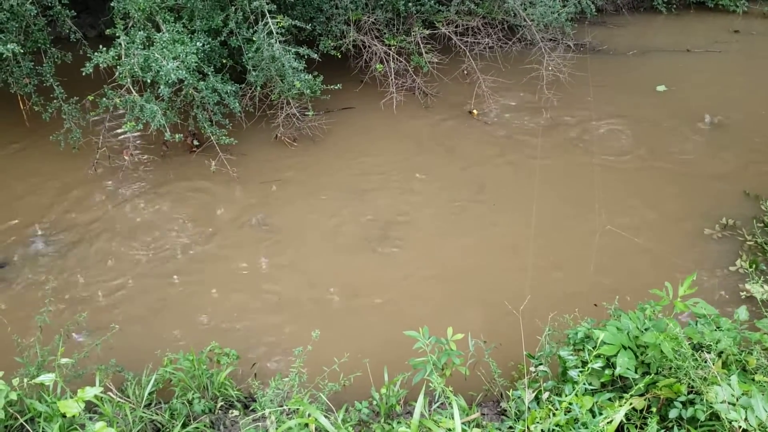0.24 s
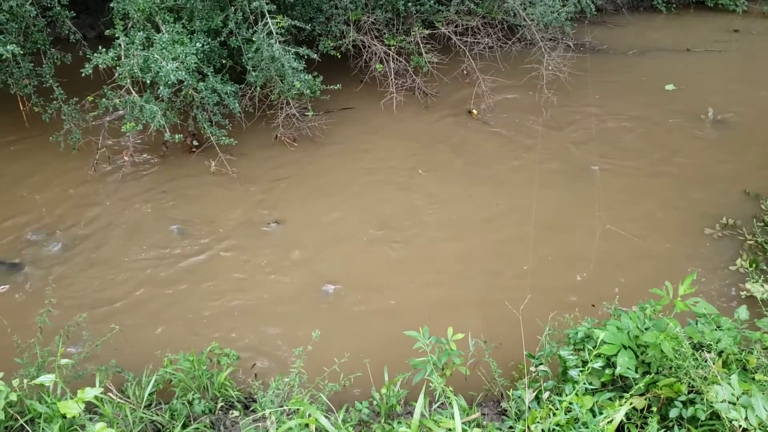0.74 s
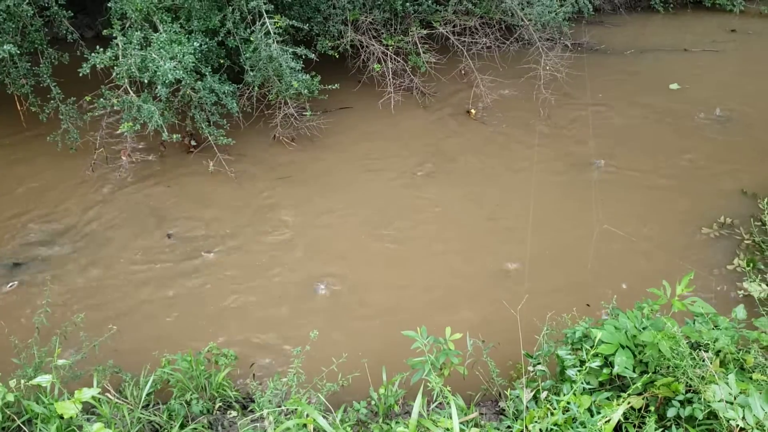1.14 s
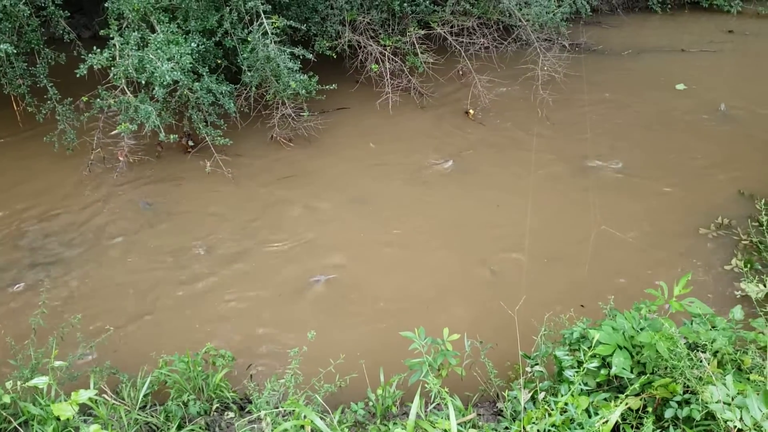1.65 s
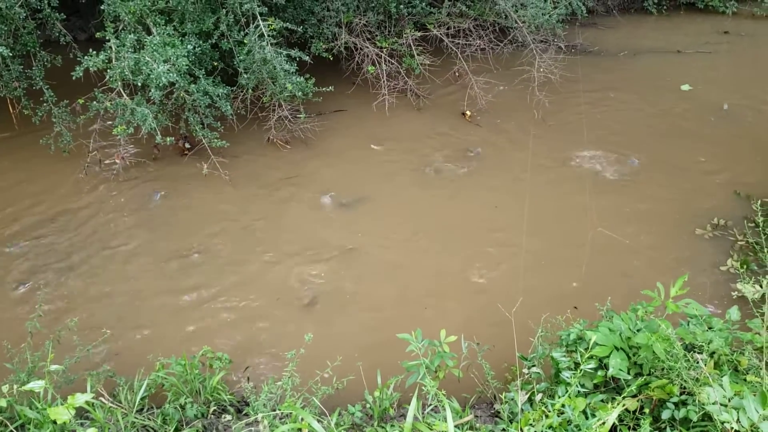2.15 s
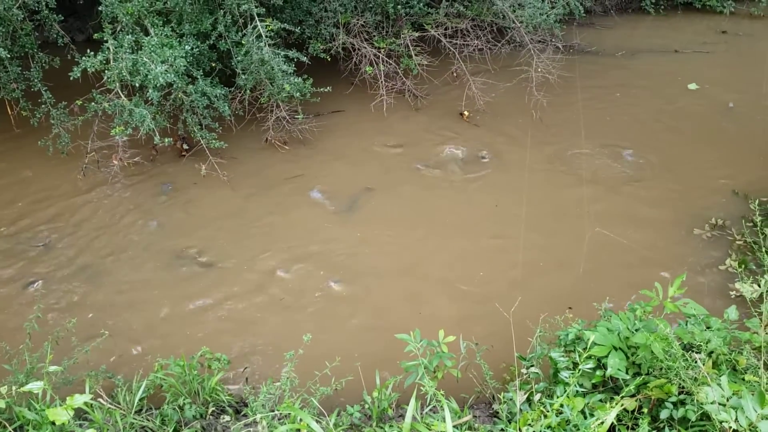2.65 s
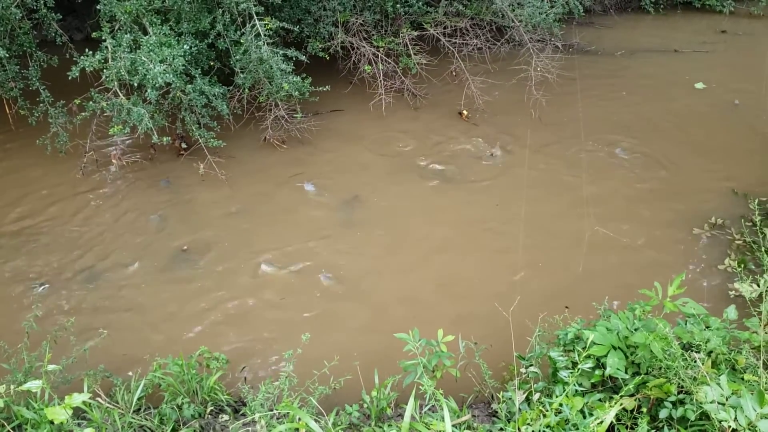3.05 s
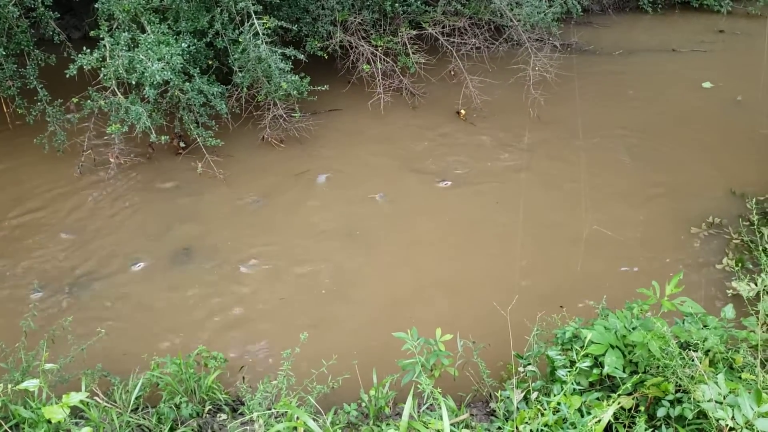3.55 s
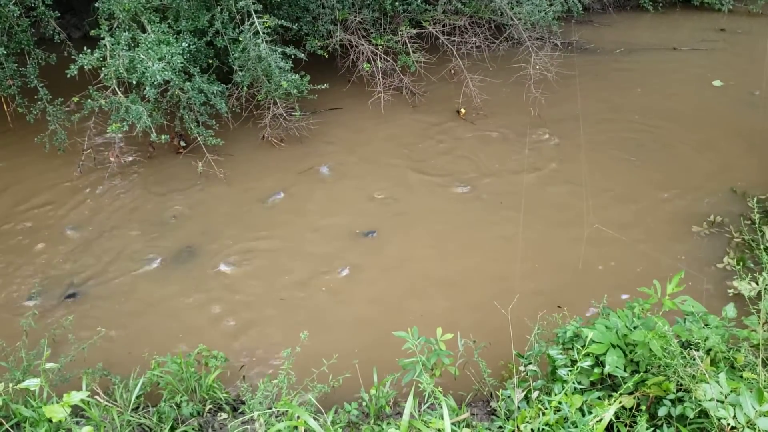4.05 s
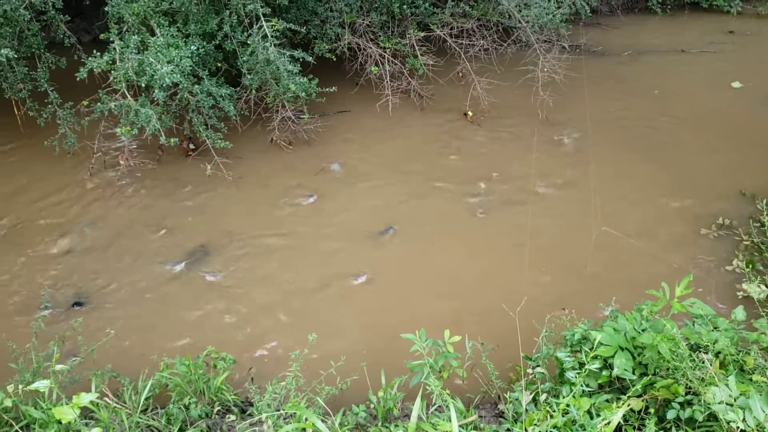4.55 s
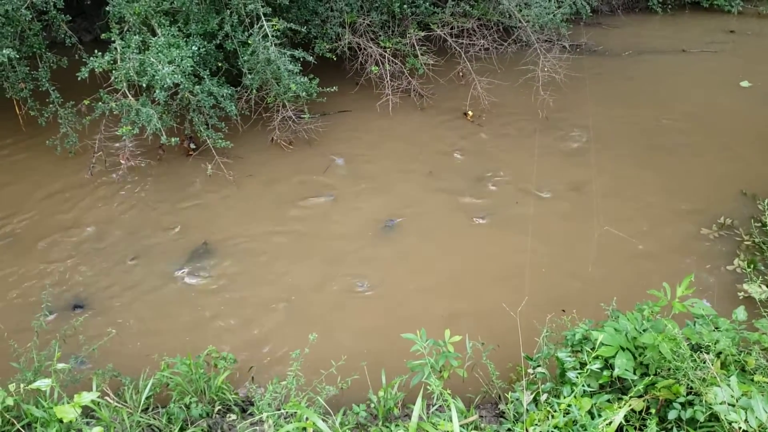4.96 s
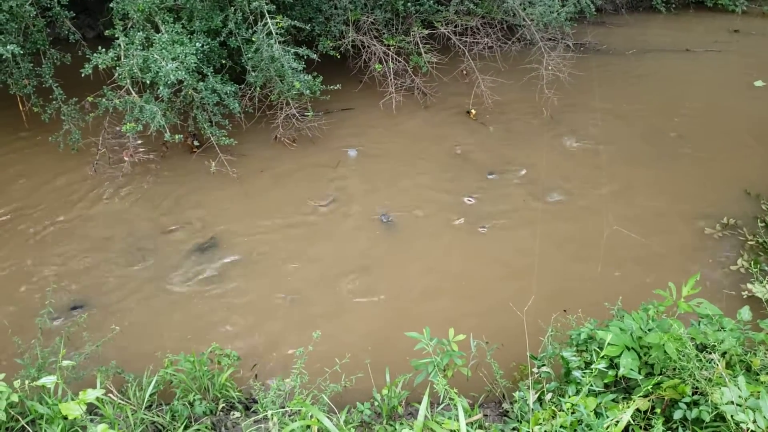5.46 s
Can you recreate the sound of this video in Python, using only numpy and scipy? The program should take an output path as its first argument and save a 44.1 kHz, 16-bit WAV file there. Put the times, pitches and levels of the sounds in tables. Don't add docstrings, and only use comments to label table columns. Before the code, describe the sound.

Wet slaps, gurgles and spray from feeding fish burst twice, separated by a quiet lull of plinking bubbles above a distant steady drone.

```python
import sys
import numpy as np
from scipy import signal
from scipy.fft import rfft, irfft, next_fast_len
from scipy.io import wavfile

SR = 44100
rng = np.random.default_rng(int(sys.argv[2]) if len(sys.argv) > 2 else 0)


def digitize_waveform(pressure):
    field = np.atleast_2d(pressure).T
    bounded = np.clip(field, -1, 1)
    quanta = np.round(bounded * 32767).astype(np.int16)
    wavfile.write(sys.argv[1], SR, quanta)


N = 251792

# freq_hz, density_db
ENGINE_COLOUR = [(18, -56), (35, -14), (60, -2.5), (90, -2), (108, -11), (123, -3), (145, -16.5),
                 (180, -20), (260, -52)]
# time_s, level_db
ENGINE_LEVEL = [(0.0, -56.5), (0.29, -44.5), (0.35, -49), (3.5, -48.5), (3.56, -43), (3.69, -53),
                (4.07, -46.5), (4.1, -48.5), (5.63, -48), (5.71, -52)]
# freq_hz, density_db
POND_LEFT = [(150, 7), (260, -2.5), (400, -10.5), (600, -16.5), (900, -12.5), (1700, -24.5), (2500, -23.5),
             (3050, -30), (3700, -32), (5800, -48), (6600, -19), (7600, -66), (13500, -50), (15500, -22)]
POND_RIGHT = [(150, 12), (260, -4.5), (400, -5.5), (520, -18), (1000, -9), (1900, -11.5), (2450, -24.5),
              (2900, -14), (4500, -22), (6500, -14), (7100, -22.5), (11400, -21.5), (13000, -18.5),
              (15500, -25.5)]
# freq_hz, likeness_0_to_1
POND_LIKENESS = [(100, 0.86), (300, 0.87), (600, 1), (1200, 0.44), (2500, 0.067), (12000, 0.084)]
# freq_hz, density_db
THRASH_LEFT = [(160, -10), (280, -15.5), (345, -6), (460, -4), (570, -31), (850, -8.5), (1600, -7),
               (1900, -9), (2500, -11), (3000, -6), (5000, -14), (7800, -16), (10000, -13.5), (15500, -11)]
THRASH_RIGHT = [(160, -11.5), (280, -18), (345, -4.5), (475, -4), (590, -21), (850, -9.5), (2000, -3),
                (3000, -5.5), (6000, -5), (7100, -13), (8000, -9), (11400, -17.5), (12800, -7.5),
                (15500, -14)]
# freq_hz, likeness_0_to_1
THRASH_LIKENESS = [(520, .97), (800, .4), (1300, .8), (2600, .62), (3400, .82), (7500, .62), (10000, .38),
                   (13000, .66)]
# freq_hz, phase_rad
THRASH_BEND = [(100, -.2), (500, -.55), (800, 0), (1300, -.7), (2300, .4), (3300, -.3), (5000, .2),
               (7000, 1.7), (7600, .8), (10000, 2.7), (11700, .4), (16000, 3.6)]
# start_s, length_s, spray_db, heavy_drop_share_db
SHOWER_EVENTS = [(0.01, 0.23, -61, -9), (0.22, 0.073, -54, -11), (0.323, 0.14, -59, -3.5),
                 (0.505, 0.43, -68, 2.5), (0.88, 0.043, -67, -10), (1.393, 0.061, -65, 0),
                 (3.637, 0.018, -60.5, -2), (3.659, 0.019, -53, -6.5), (4.118, 0.11, -67, -7),
                 (4.313, 0.083, -58, 3.5), (4.43, 0.1, -63.5, -15)]
# start_s, length_s, strength_db, depth_db
SURGE_EVENTS = [(1.49, 0.01, -56, 1), (1.551, 0.065, -49.5, 3), (1.729, 0.085, -57.5, 10.5),
                (1.851, 0.11, -51.5, 7.5), (1.977, 0.13, -39, -2), (2.12, 0.13, -49, -8.5),
                (2.2, 0.11, -41.5, -5.5), (2.329, 0.1, -39.5, -5), (2.43, 0.099, -46, -6.5),
                (2.55, 0.056, -51.5, -2.5), (2.63, 0.075, -57, -1.5), (2.72, 0.12, -59.5, 1),
                (4.45, .23, -60.5, 0.5), (4.691, 0.076, -63.5, 9), (4.73, 0.12, -57.5, 7.5),
                (4.866, 0.061, -49.5, 3.5), (4.944, 0.08, -40, -5.5), (5.05, 0.07, -46.5, -1),
                (5.119, 0.058, -39, -7), (5.19, 0.12, -44, -6), (5.291, 0.044, -35.5, -15),
                (5.35, 0.048, -43.5, -2), (5.42, 0.058, -41.5, -12), (5.51, 0.11, -49.5, -1),
                (5.61, 0.15, -58.5, -4)]
# start_s, peak_db
TICK_EVENTS = [(0.0313, -40), (0.0473, -33), (0.0786, -33), (0.16, -36), (0.211, -28), (0.2274, -28.5),
               (0.283, -43), (0.3133, -33.5), (0.3995, -32), (0.455, -42), (0.591, -41), (0.6814, -50),
               (2.4044, -20), (2.475, -40), (2.5914, -37), (3.348, -41), (3.6561, -42), (3.68, -28),
               (4.1113, -48), (4.1387, -39), (4.1684, -46), (4.2053, -36.5), (4.6483, -40), (5.4985, -38),
               (5.6564, -37)]
# start_s, peak_db, gurgle_share_db, spray_share_db
FIRST_BOUT_SLAPS = [(1.5474, -40, -15, -21), (1.555, -31, -6, -23), (1.5875, -23.5, -6.5, -21.5),
                    (1.8517, -37.5, 7.5, -30), (1.926, -36.5, -8, -4), (1.9746, -44, -10, -6),
                    (2.0044, -43, -20, -27), (2.047, -28, -6, -19), (2.092, -22, -18, -20),
                    (2.211, -25.5, -32, -34), (2.232, -42.5, -14, -24.5), (2.258, -17, -28, -36),
                    (2.2726, -21.5, -29, -25), (2.3438, -21.5, -19, -31), (2.373, -18, -10, -28),
                    (2.4529, -25, -5, -17.5), (2.5048, -21, -7, -21), (2.536, -26, -10, -17),
                    (2.61, -29, -2, -16), (2.6198, -27, -2, -16), (2.7344, -30.5, -32, -19),
                    (2.7922, -29, -1.5, -21), (2.867, -27, -4.5, -16)]
SECOND_BOUT_SLAPS = [(4.291, -39, -15, -9), (4.3158, -27, -15, -17), (4.4351, -34.5, -5, -8),
                     (4.882, -31, 1, -21), (4.9243, -30.5, 0, -24), (4.9404, -37, -4, -25),
                     (4.964, -27.5, 3, -30), (5.035, -30.5, -8, -12), (5.0948, -31, 3.5, -24),
                     (5.1332, -31.5, 6.5, -27), (5.155, -22, -12, -33), (5.264, -24, -3, -26),
                     (5.299, -17, -18, -32), (5.314, -25, -22, -16), (5.384, -16.5, -12, -22),
                     (5.419, -35, 3, -10), (5.435, -21.5, -4.5, -18), (5.458, -32, -38, -5.5),
                     (5.4782, -24, -4, -14), (5.5425, -25.5, -14, -12.5), (5.56, -33, 5, -24),
                     (5.697, -39.5, 1, -21)]
# start_s, peak_db, gurgle_share_db, spray_share_db
CLIPPING_SLAPS = [(2.1173, -30, -24, -27), (2.1464, -21, -30, -33), (2.394, -15, -32, -19),
                  (2.4043, -11, -28, -20), (2.41, -18, -30, -20), (2.416, -15, -25, -23),
                  (2.5788, -18.5, -8.5, -21), (2.593, -29, 1, -20), (5.3929, -11.5, -19, -21),
                  (5.401, -23, -8, -19), (5.5162, -20.5, -13, -17), (5.6075, -23.5, -7.5, -21),
                  (5.6416, -27.5, -5, -20), (5.647, -30, -2.5, -25)]
# start_s, peak_db, pitch_hz, rise_octaves_per_s
GULP_EVENTS = [
    (.018, -42, 404, -5),
    (1.286, -49, 3200, 6),
    (1.925, -26.5, 920, 11),
    (2.713, -32.5, 413, -11),
    (2.794, -38.5, 470, -6),
    (2.868, -35, 527, 19),
    (3.098, -44, 990, 30),
    (4.527, -33, 187, -2.5),
    (4.53, -27, 430, 18.5),
    (4.541, -37, 630, -45),
]
# start_s, peak_db, pitch_hz, rise_octaves_per_s
PLINK_EVENTS = [(.174, -40.5, 1650, 6), (.227, -54, 1580, 3), (.36, -47, 1770, 6), (.379, -55, 1400, 7),
                (.467, -47, 1580, 0), (.468, -51, 4560, 1), (.553, -58, 3150, 0), (.668, -62, 2280, 8),
                (.55, -45.5, 690, -2), (.648, -46, 1800, 19), (.683, -51.5, 4630, -8),
                (.704, -50.5, 730, 6), (.768, -53, 796, 0), (.815, -49, 1560, 1), (.834, -53.5, 1980, -6),
                (1.133, -53, 1610, 2), (1.368, -55, 815, 13), (1.4, -48, 2960, -2), (1.451, -46.5, 736, 9),
                (1.945, -39, 896, 15), (2.14, -41.5, 740, -10), (2.674, -51, 1270, 7),
                (2.826, -46.5, 790, 36), (3.011, -47.5, 1040, -3), (3.245, -52.5, 3600, 0),
                (3.284, -63, 1680, -2), (3.293, -55, 1720, 0), (4.128, -52, 950, 17), (4.47, -42, 1580, 15),
                (4.585, -45, 890, 17), (5.638, -48, 915, 12), (5.66, -46, 890, 27)]
# start_s, peak_db, pitch_hz,
# rise_octaves_per_s
SINGER_EVENTS = [(.206, -51, 1296, 10), (.408, -59, 747, -6.5), (.52, -60, 686, -2), (.724, -62, 1020, 4),
                 (1.348, -62.5, 1500, -23), (2.96, -65, 990, 5), (3.022, -60.5, 1250, 22),
                 (3.112, -62, 790, -2), (4.371, -45, 804, 44), (4.385, -55, 913, 12.5),
                 (4.548, -52, 592, 21.5), (4.585, -58.5, 1250, 13.5), (4.61, -69, 1940, -12)]
# start_s, peak_db
FAT_DROPS = [(0.0324, -48), (0.338, -51), (0.625, -55), (0.682, -55), (1.4156, -53), (1.4325, -51),
             (2.116, -44), (2.2111, -52), (2.49, -32), (2.539, -39), (2.5496, -40), (2.5928, -41),
             (3.0421, -62), (3.102, -57), (4.394, -55), (4.8842, -38), (5.1891, -42), (5.4203, -34.5),
             (5.5086, -30.5), (5.544, -33), (5.609, -36), (5.6792, -45)]
MID_DROPS = [(0.0315, -56), (0.0805, -54), (0.3134, -57), (0.4001, -55), (0.4726, -44), (0.5908, -50),
             (0.6666, -56), (1.5187, -53), (1.5481, -47), (1.6507, -55), (1.9247, -44), (1.9742, -51),
             (2.1442, -31.5), (2.2898, -27), (2.3965, -31), (2.4024, -35), (2.4536, -41), (2.4761, -42),
             (2.579, -44), (2.5922, -53), (2.621, -48), (2.6935, -55), (2.7118, -54), (2.7354, -39),
             (2.7943, -40), (4.3148, -33), (4.4415, -48), (4.6498, -55), (5.035, -37), (5.097, -33),
             (5.1566, -24.5), (5.3373, -32), (5.3866, -35), (5.5091, -46)]
SMALL_DROPS = [(0.2838, -52), (0.3132, -46), (0.4565, -48), (0.5171, -50), (0.8253, -55), (0.9068, -58),
               (1.2857, -53), (1.4006, -53), (1.5784, -53), (1.6165, -48), (1.9949, -46), (2.2133, -50),
               (2.3297, -51), (2.3377, -50), (2.3486, -48), (2.4761, -44), (2.5159, -37), (2.579, -38),
               (2.5928, -49), (2.6129, -46), (2.7116, -53), (2.8302, -56), (3.3489, -51), (4.1255, -56),
               (4.1694, -52), (4.3381, -44), (4.4384, -45), (4.5102, -52), (4.6345, -51), (4.9416, -46),
               (5.0499, -47), (5.2495, -49), (5.4028, -41), (5.4693, -41), (5.4751, -40), (5.4998, -50),
               (5.6088, -42), (5.6411, -52)]
FINE_DROPS = [(0.0315, -49), (0.1382, -53), (0.2287, -26), (0.3131, -36), (0.3999, -54), (0.6026, -43),
              (0.8453, -57), (1.2856, -56), (1.3607, -53), (1.3882, -46), (1.3984, -42), (1.4082, -52),
              (1.5952, -46), (1.9731, -35), (1.9949, -47), (2.072, -31.5), (2.0923, -41), (2.1393, -43),
              (2.1748, -48), (2.2124, -49), (2.2697, -44), (2.2902, -41), (2.3141, -49), (2.3379, -45),
              (2.3453, -47), (2.38, -45), (2.405, -29.5), (2.4614, -48), (2.6129, -43), (2.6525, -42),
              (2.7132, -48), (2.9939, -53), (3.0993, -51), (3.6027, -49), (3.6565, -45), (4.208, -44),
              (4.3374, -34), (4.4355, -42), (4.6713, -45), (4.7375, -44), (4.7609, -44), (4.8516, -45),
              (4.8589, -50), (5.0967, -48), (5.1531, -41), (5.177, -56), (5.3209, -40), (5.3824, -35),
              (5.3926, -36), (5.4018, -42), (5.4998, -48), (5.5161, -45), (5.5604, -48)]
# low_hz, high_hz, t60_s, gain_db
DROP_VOICES = [
    (1530, 2850, .016, 0),
    (3670, 7700, 0.0075, 1.5),
    (7800, 11300, 0.0098, 2.5),
    (11000, 21600, 0.0067, 3.5),
]

POND_LEAD_S = -.00036


def from_db(db):
    return 10 ** (np.asarray(db) / 20)


def rms_one(x):
    return x / np.sqrt(np.mean(x ** 2) + 1e-20)


def in_time(rows):
    s, *columns = np.transpose(rows)
    return [np.interp(np.arange(N) / SR, s, c) for c in columns]


def at_hz(points, hz):
    freq_hz, value = np.transpose(points)
    return np.interp(np.log(hz + 1), np.log(freq_hz), value)


def drift(rate_hz):
    r = np.exp(-2 * np.pi * rate_hz / SR)
    wander = signal.lfilter([1], [1, -2 * r, r * r], rng.standard_normal(N + SR))
    return rms_one(wander[SR:])


def band(x, low_hz, high_hz, order=4):
    return signal.sosfilt(signal.butter(order, [low_hz, high_hz], "band", fs=SR, output="sos"), x)


def at_microphones(sources, left, right, likeness, lead_s, bend=((20, 0), (20000, 0))):
    size = next_fast_len(N)
    hz = np.fft.rfftfreq(size, 1 / SR)
    shared, *own = rfft(sources, size)
    alike = np.clip(at_hz(likeness, hz), 0, 1)
    turn = np.exp(1j * (np.pi * hz * lead_s + at_hz(bend, hz) / 2))
    pair = []
    for colour, shift, scattered in zip((left, right), (turn, 1 / turn), own):
        wave = np.sqrt(alike) * shared * shift + np.sqrt(1 - alike) * scattered
        pair.append(from_db(at_hz(colour, hz)) * wave)
    return irfft(np.array(pair), size)[:, :N]


def droplets(per_s, cycles, low_hz, high_hz):
    born = rng.random(N) < per_s / SR
    sizes = from_db(2.8 * np.minimum(rng.exponential(1, N), 4)) * born + 1e-18
    out, dealt = 0, rng.integers(0, 16, N)
    for k, hz in enumerate(np.geomspace(low_hz, high_hz, 16)):
        r, w = from_db(-60 * hz / (cycles * SR)), 2 * np.pi * hz / SR
        ringing = signal.lfilter([1, 0, -1], [1, -2 * r * np.cos(w), r * r], sizes * (dealt == k))
        out = out + np.sqrt(hz) * rms_one(ringing)
    return rms_one(out)


def rumble():
    noise = rng.standard_normal((3, N))
    low = at_microphones(noise, ENGINE_COLOUR, ENGINE_COLOUR, [(30, 1.0), (150, 0.94)], 0)
    pitch_hz = 123 + 3.19 * drift(5.82)
    drone = np.sin(2 * np.pi * np.cumsum(pitch_hz) / SR) * from_db(-4.5 + 1.3 * drift(12))
    return from_db(in_time(ENGINE_LEVEL)[0]) * (rms_one(low) + drone)


def pond():
    sources = rng.standard_normal((3, N))
    sources[0] += 0.32 * droplets(140, cycles=34.0, low_hz=564, high_hz=1980)
    bed = at_microphones(sources, POND_LEFT, POND_RIGHT, POND_LIKENESS, POND_LEAD_S)
    level_db = -57 + 1.9 * np.tanh(drift(22.0)) + 2.57 * np.tanh(drift(14.4))
    return from_db(level_db) * rms_one(band(bed, 206, 19600))


def insects():
    chorus = band(rng.standard_normal((2, N)), 8900, 10000, order=2)
    return from_db(-66 + 1.0 * drift(1.2)) * rms_one(chorus) * from_db([[-2.5], [1.5]])


def at_churn(sources):
    lead_s = .000454
    return at_microphones(sources, THRASH_LEFT, THRASH_RIGHT, THRASH_LIKENESS, lead_s, THRASH_BEND)


def swells(times, lengths, levels_db):
    attack_db_per_s, release_db_per_s = 800, 260
    t = np.arange(0, N, 32) / SR
    early = np.maximum(times[:, None] - t, 0)
    late = np.maximum(t - (times + lengths)[:, None], 0)
    level_db = levels_db[:, None] - attack_db_per_s * early - release_db_per_s * late
    return np.interp(np.arange(N) / SR, t, from_db(2 * level_db).sum(axis=0))


def bursts(times, peaks_db, decays):
    power, t = np.zeros(N), np.arange(SR // 8) / SR
    onset = 1 - np.exp(-t / 0.00039)
    for s, db, t60 in zip(times, peaks_db, np.maximum(decays, .003)):
        wash = 0.44 * from_db(-120 * t / t60) + 0.05 * from_db(-120 * t / (3.3 * t60))
        start = max(round(s * SR) - 16, 0)
        power[start:start + len(t)] += (from_db(2 * db) * onset * wash)[:N - start]
    return power


def spatter(per_s, spread_db, decay_s):
    landed = rng.random(N) < per_s / SR
    sizes = from_db(2 * spread_db * np.minimum(rng.exponential(1, N), 2.5)) * landed
    power = signal.lfilter([1], [1, -np.exp(-1 / (decay_s * SR))], sizes + 1e-18)
    return power / power.mean()


def contact(low_hz, high_hz):
    click = np.zeros((3, N))
    click[:, 200] = 1
    return band(at_churn(click), low_hz, high_hz)[:, :800]


def cracks(times, peaks_db, low_hz, high_hz):
    train, shape = np.zeros((1, N)), contact(low_hz, high_hz)
    polarity = np.sign(np.sin(12000.0 * times))
    train[0, (times * SR).astype(int)] = from_db(peaks_db) * polarity
    return signal.fftconvolve(train, shape / np.abs(shape).max(), axes=1)[:, 190:190 + N]


def thrashing():
    sources = rng.standard_normal((3, N))
    sources[0] = rms_one(sources[0] + 1.6 * droplets(1500, cycles=10.0, low_hz=618, high_hz=13640))
    wave = at_churn(sources)

    start, length, db, depth = np.transpose(SURGE_EVENTS)
    fall, span, fine_db, heavy = np.transpose(SHOWER_EVENTS)
    churn = swells(start, length, db) + swells(fall, span, fine_db + heavy)
    gurgle = swells(start, length, db + 2 + 0.6 * depth)
    cavity = swells(start, length, db + depth)
    spray = 4 * swells(start, length, db - 12.5 + 0.26 * depth)
    shower = 1.63 * swells(fall, span, fine_db) * from_db(2.5 * drift(90))

    full_slaps = FIRST_BOUT_SLAPS + SECOND_BOUT_SLAPS
    s, peak_db, gurgle_share, spray_share = np.transpose(full_slaps + CLIPPING_SLAPS)
    t60 = np.where(np.arange(len(s)) < len(full_slaps), .033, .01)
    tick_s, tick_db = np.transpose(TICK_EVENTS)
    ticks = bursts(tick_s, tick_db - 3.0, np.full(len(tick_s), .006))

    chop = 0.66 + 0.34 * spatter(220, spread_db=1.5, decay_s=0.019)
    chop_low = 0.12 + 0.49 * chop + 0.054 * spatter(190, spread_db=1.0, decay_s=0.0051)
    chop_fine = 0.18 + 0.55 * chop + 0.56 * spatter(400, spread_db=-22.0, decay_s=0.0027)

    cavity = cavity * from_db(-5.5 + 5.44 * drift(28)) + bursts(s, peak_db + gurgle_share - 14.0, 2.0 * t60)
    gurgle = gurgle * 0.84 * chop_low + bursts(s, peak_db + gurgle_share - 5.5, 2.27 * t60)
    body = churn * 0.79 * chop + bursts(s, peak_db - 7, t60) + 0.17 * ticks
    spray = spray * 0.23 * chop_fine + bursts(s, peak_db + spray_share + 3.5, 1.12 * t60)
    shower = shower + ticks
    sizzle = 0.0033 * body + 0.56 * spray + 0.17 * shower

    edges_hz = ((150, 637), (580, 2280), (2550, 6820), (7200, 10900), (10800, 15500))
    powers = (cavity, gurgle, body, sizzle, spray + shower)
    wash = sum(np.sqrt(power) * rms_one(band(wave, *edges)) for power, edges in zip(powers, edges_hz))
    return wash + cracks(s, peak_db - 13.5, 860, 9900) + cracks(tick_s, tick_db - 12, 4500, 14000)


def bubbles():
    out, lag = np.zeros((2, N + SR)), round(-POND_LEAD_S * SR)
    t, waver = np.arange(SR // 6) / SR, np.resize(drift(78), N + SR)
    kinds = ((GULP_EVENTS, 11.4), (PLINK_EVENTS, 21), (SINGER_EVENTS, 95))
    for s, db, hz, rise, cycles in [(*row, cycles) for rows, cycles in kinds for row in rows]:
        t60, start = cycles / hz, round(s * SR)
        unrest = waver[start:start + len(t)]
        octaves = np.minimum(rise * t, .85) + 0.048 * unrest
        phase = 2 * np.pi * np.cumsum(hz * 2 ** octaves) / SR
        life_s = min(.034, 0.66 / max(rise, 1)) if rise > 15 or t60 > .14 else 1
        swell = (1 - np.exp(-t * hz / 1.44)) ** 2 * np.clip((life_s - t) / 0.0034 + 1, 0, 1)
        tone = from_db(db - 60 * t / t60 + 2.7 * unrest[::-1]) * swell * np.sin(phase)
        shade_db = 12.8 * min(hz / 1500, 1)
        out[0, start + lag:start + lag + len(t)] += tone * from_db(-.6 * shade_db + 8.0)
        out[1, start:start + len(t)] += tone * from_db(1.2 * shade_db + 6.0)
    out[:, 400:] += 0.14 * out[::-1, :-400]
    return out[:, :N]


def drops():
    out, flurry = 0, rng.choice([-1., 1.], N)
    sizes = (FAT_DROPS, MID_DROPS, SMALL_DROPS, FINE_DROPS)
    for rows, (low_hz, high_hz, t60, gain_db) in zip(sizes, DROP_VOICES):
        s, db = np.transpose(rows)
        train = flurry * np.sqrt(bursts(s, db + gain_db, np.full(len(s), t60)))
        shape = contact(low_hz, high_hz)
        shape = shape / np.sqrt(np.sum(shape.mean(axis=0) ** 2))
        out = out + signal.oaconvolve(train[None], shape, axes=1)[:, 200:200 + N]
    return out


def swish():
    t = np.maximum(np.arange(N) / SR - .043, 0)
    noise = rng.standard_normal((2, N)) + 0.22 * rng.standard_normal(N)
    hiss = rms_one(band(noise, 4500, 5600, order=2)) * from_db(-60 * t / 0.98 + 2.1 * drift(60))
    opening = rms_one(band(noise, 4340, 4900)) * from_db(1.5 - 60 * t / 0.035)
    return (hiss + opening) * from_db(-52.5) * (t > 0) * from_db([[-3], [2.5]])


def scene():
    return rumble() + pond() + insects() + thrashing() + bubbles() + drops() + swish()


def band_limit(x):
    return signal.sosfilt(signal.butter(12, 17010, fs=SR, output="sos"), x)


def record(dry):
    cut = signal.sosfilt(signal.ellip(10, .3, 45, 15760, fs=SR, output="sos"), dry)
    return band_limit(cut)


dry = scene()
out = record(dry)
digitize_waveform(out)
```